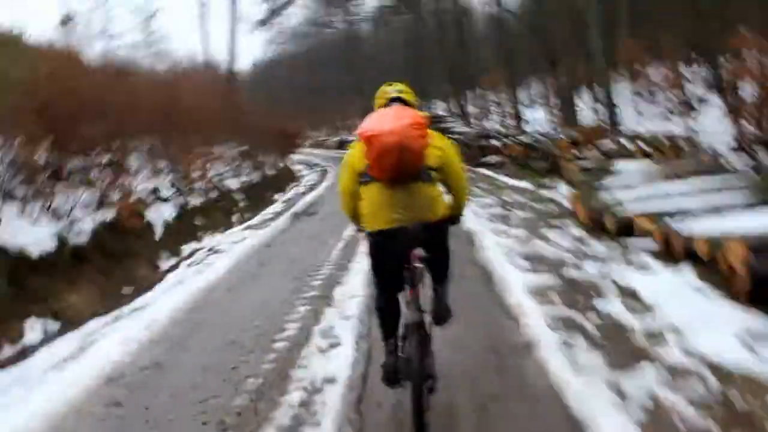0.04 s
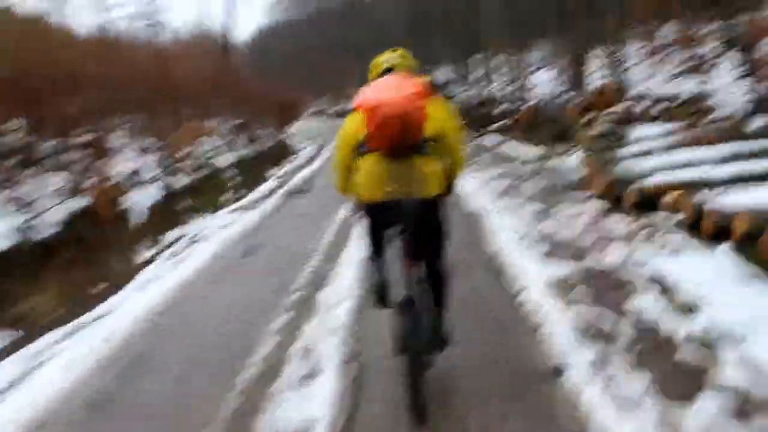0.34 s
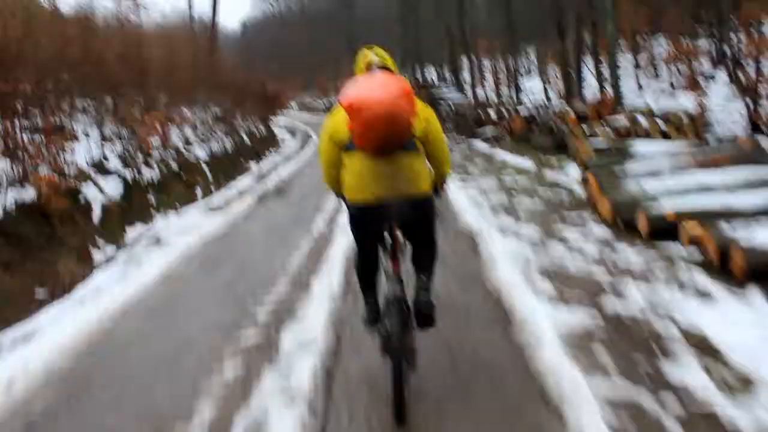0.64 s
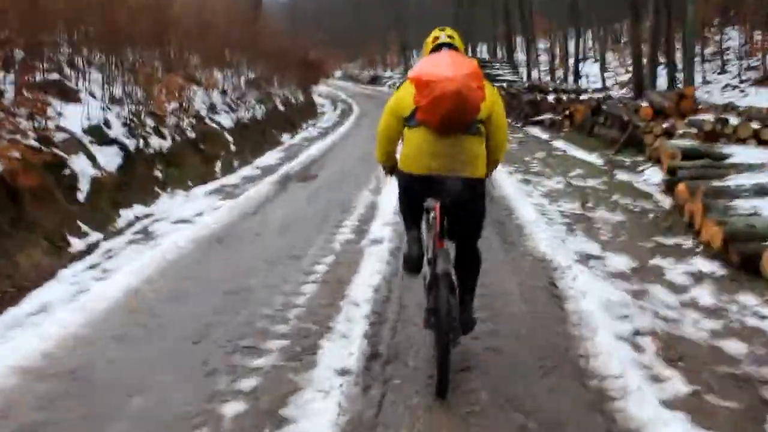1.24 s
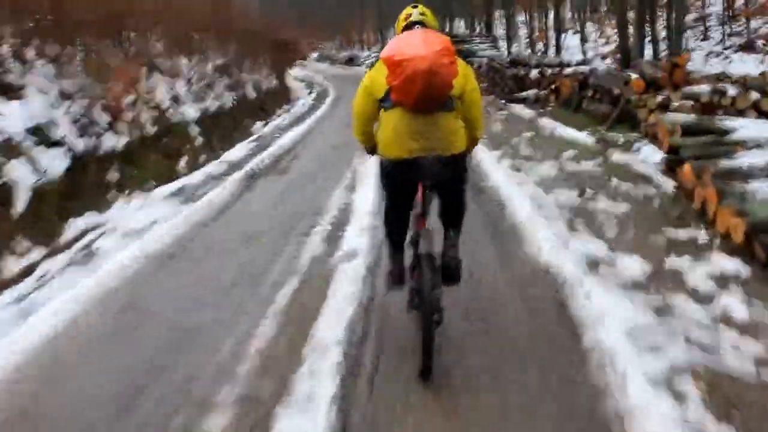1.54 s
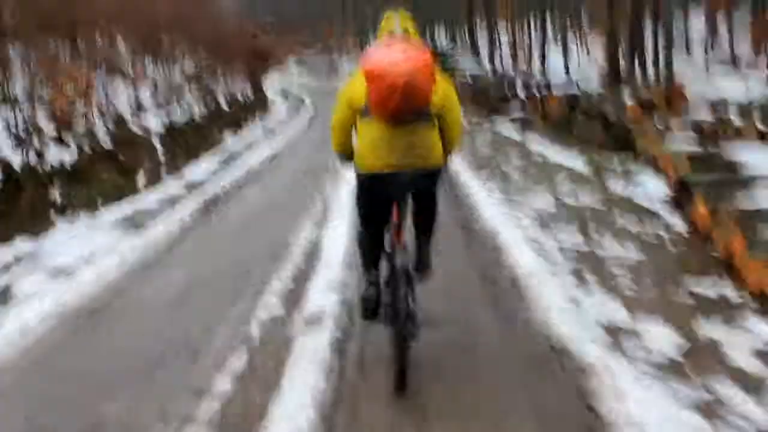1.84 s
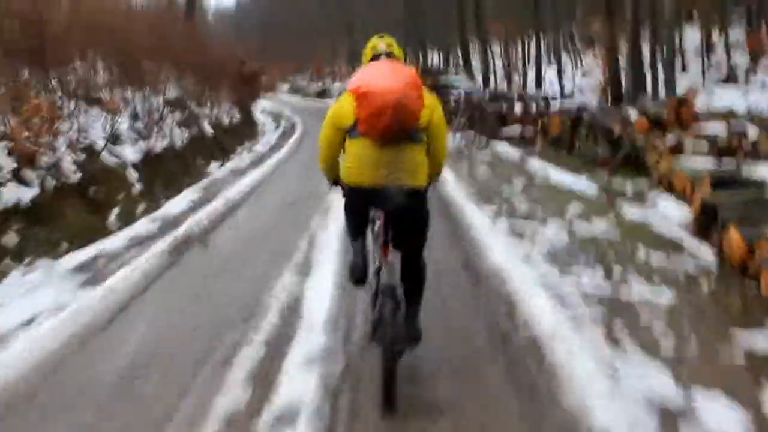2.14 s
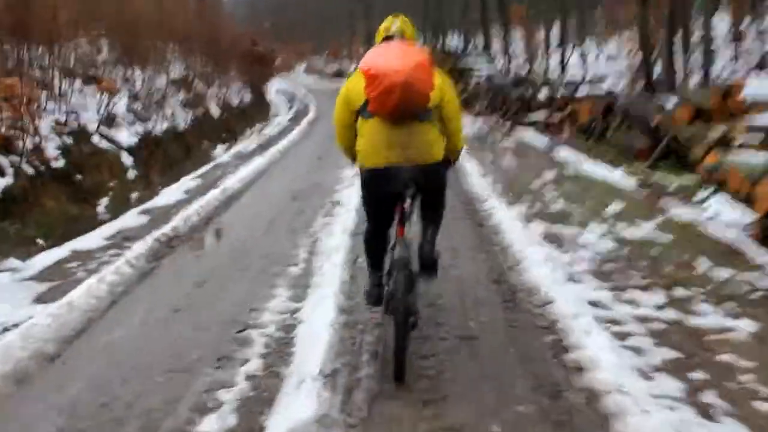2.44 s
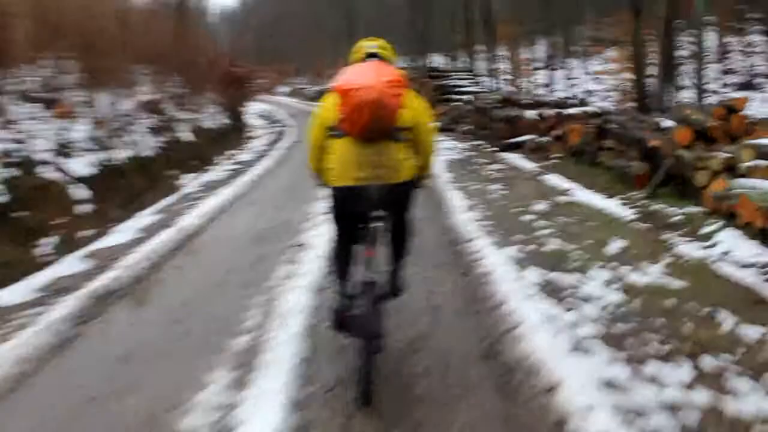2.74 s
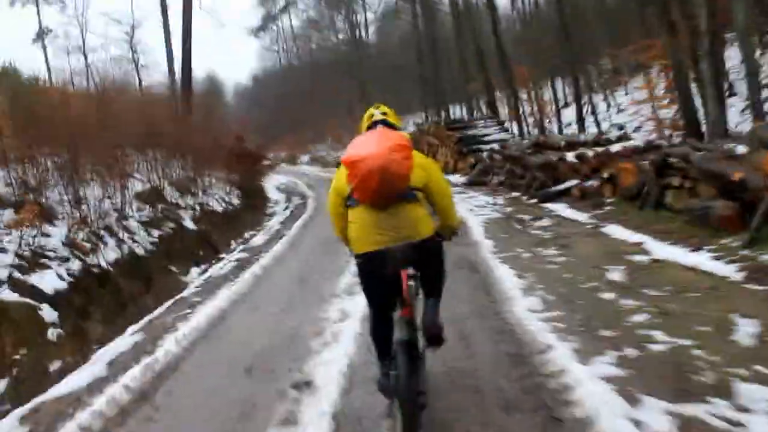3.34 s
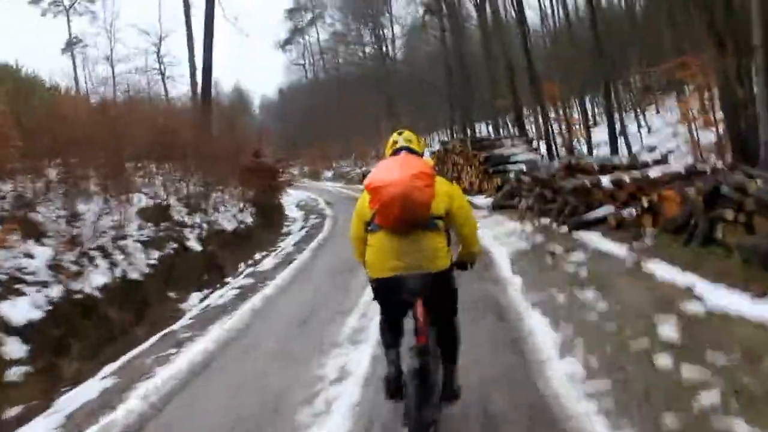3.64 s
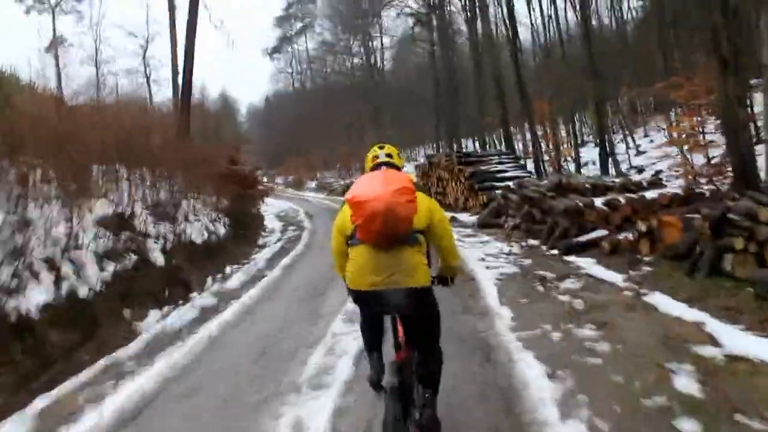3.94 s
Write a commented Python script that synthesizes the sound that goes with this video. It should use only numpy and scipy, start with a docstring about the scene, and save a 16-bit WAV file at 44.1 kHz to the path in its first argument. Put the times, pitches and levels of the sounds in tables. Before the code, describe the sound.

Bicycle tyres hiss and crackle over a wet, slushy forest track, with brief squelches and faint ticks of grit. Loud headwind rumbles on the moving microphone throughout, in uneven gusts with short thumps. The hardest blasts come around 0.3 to 0.5 seconds, with more near 0.8, 1.3, 2.8 and 3.2. From about 3.5 seconds the tyre spray grows quieter while the wind keeps buffeting.

```python
"""Mountain bike tyres on a wet, slushy forest track, heard from a bike riding behind.
The tread throws a spray of drops that hisses and crackles, flicks wet grit and now and then squelches
through slush. Headwind rumbles loudly on the moving microphone in gusts, with single eddies thumping
on the port; a limiter ducks everything after the hardest hits."""
import sys
import numpy as np
from scipy import signal
from scipy.fft import rfft, irfft
from scipy.io import wavfile
from scipy.ndimage import uniform_filter1d

SR = 44100
rng = np.random.default_rng(int(sys.argv[2]) if len(sys.argv) > 2 else 0)


def transcribe(signal):
    """Save signal, clipped to [-1, 1], as a 16-bit WAV file at the path in sys.argv[1]."""
    frames = np.atleast_2d(signal).T
    limited = np.clip(frames, -1, 1)
    pcm = np.round(limited * 32767).astype(np.int16)
    wavfile.write(sys.argv[1], SR, pcm)


N = 176400
TIME = np.arange(N) / SR


def from_db(db):
    """Decibels to gain."""
    return 10 ** (np.asarray(db) / 20)


def unit_power(x):
    """Normalise to an RMS of one."""
    return x / np.sqrt(np.mean(x ** 2) + 1e-20)


def automation(points):
    """A fader ride: straight lines between (seconds, value) points."""
    return np.interp(TIME, *np.transpose(points))


def coloured(x, curve):
    """EQ with a (Hz, dB) curve, falling 12 dB per octave past its ends; unit power."""
    hz, db = np.transpose(curve)
    log_hz = np.log(np.maximum(np.arange(N // 2 + 1) * SR / N, 1))
    beyond = np.maximum(np.log(hz[0]) - log_hz, 0) + np.maximum(log_hz - np.log(hz[-1]), 0)
    gain = from_db(np.interp(log_hz, np.log(hz), db)) * np.exp(-2 * beyond)
    return unit_power(irfft(rfft(x) * gain, N))


def band_around(x, hz, width):
    """Band-pass around a pitch, the width roughly a share of that pitch; unit power."""
    edges = np.clip(hz * np.exp(np.array([-.5, .5]) * width), 20, SR / 2 - 10)
    return unit_power(signal.sosfilt(signal.butter(2, edges, "band", fs=SR, output="sos"), x))


def drift(rate_hz):
    """Smooth random modulation with a spread of one."""
    hop, run_in = 40, 2000
    pole = np.exp(-2 * np.pi * rate_hz * hop / SR)
    noise = rng.standard_normal(N // hop + run_in + 2)
    slow = signal.lfilter([1], [1, -2 * pole, pole * pole], noise)[run_in:]
    return np.interp(np.arange(N) / hop, np.arange(len(slow)), unit_power(slow))


def grains(per_s, spread_db):
    """Random clicks, many small and a few large; unit power."""
    sizes = from_db(spread_db * np.minimum(rng.exponential(1, N), 4.5)) * rng.choice([-1, 1], N)
    return unit_power(sizes * (rng.random(N) < per_s / SR))


def swell(start, length, attack_s, release_s):
    """Envelope with a linear attack, a hold and an exponential release."""
    rise = np.clip((TIME - start) / attack_s + .5, 0, 1)
    fall = np.exp(-np.clip((TIME - start - length) / release_s, 0, 20))
    return rise * fall


def turbulence(source, colour, window_s=0.0167, evenness=0.75):
    """Lumpy air pressure, levelled to a fairly steady strength."""
    pressure = coloured(source, colour)
    power = uniform_filter1d(pressure ** 2, int(window_s * SR)) + 1e-4
    return unit_power(pressure / power ** (evenness / 2))


def headwind():
    """Air streaming over the moving microphone: a low rumble that comes in short puffs."""
    # Strength of the wind bed. Each row: time in seconds, level in dB before trim and puffs.
    strength = [(0, -20), (.22, -18), (.3, -25), (.5, -16.5), (.61, -28), (.71, -29.5), (.82, -21),
                (.9, -20), (1.12, -21), (1.25, -34.5), (1.3, -19), (1.7, -20), (1.8, -20.5), (1.94, -23),
                (1.99, -25.5), (2.1, -17), (2.5, -20), (2.66, -15), (2.71, -23), (2.95, -14), (3.03, -32.5),
                (3.11, -25), (3.2, -19), (3.68, -20.5), (3.76, -22), (3.81, -29.5), (3.88, -25), (4, -13)]
    # Tone of the rumble. Each row: frequency in Hz, relative level in dB.
    colour = [(25, -24), (50, -5), (100, 4.5), (200, 1), (300, -3), (450, -12.5), (700, -23), (1200, -38),
              (2500, -51)]
    trim_db = -3.5
    puffs_db = 5.5 * np.minimum(drift(rate_hz=25.5), 1)
    level = from_db(automation(strength) + trim_db + puffs_db)
    return level * turbulence(rng.standard_normal(N), colour)


def gusts():
    """Gusts buffet the microphone: low blasts with a ragged flutter on top."""
    # Each row: start in seconds, length in seconds, body and flutter levels in dB before their trims.
    blasts = [(.028, 0.033, -13.5, -31), (0.123, 0.037, -10.5, -28), (.166, .044, -16.5, -36),
              (0.316, 0.023, -4.5, -29), (0.342, 0.028, -2.5, -11.5), (0.377, 0.029, -9.5, -17),
              (0.418, 0.021, -5.5, -21), (0.451, 0.021, -4, -18.5), (0.644, 0.021, -14.5, -50),
              (.738, 0.022, -12, -29), (0.768, 0.01, -3.5, -12), (0.792, 0.005, -10, -30),
              (0.968, 0.013, -14.5, -35), (1.181, 0.024, -8, -20), (1.276, 0.012, -13.5, -42),
              (1.321, 0.052, -12, -28), (1.375, 0.025, -7.5, -19.5), (1.534, 0.017, -10, -30.5),
              (1.564, 0.014, -9.5, -21.5), (1.626, 0.02, -12, -29), (1.75, 0.014, -25, -26),
              (1.846, 0.015, -16.5, -48), (1.871, 0.014, -10, -21), (1.899, 0.023, -12, -28),
              (2.034, 0.013, -10, -31), (2.062, 0.034, -12, -24), (2.175, 0.014, -13.5, -28),
              (2.199, 0.027, -10.5, -27), (2.241, 0.04, -11.5, -30.5), (2.302, 0.013, -9.5, -31.5),
              (2.409, 0.0089, -13.5, -25.5), (2.445, 0.025, -17, -50), (2.51, 0.011, -14, -24.5),
              (2.558, 0.038, -18, -36), (2.611, 0.034, -16.5, -29), (2.737, .016, -9.5, -28),
              (2.755, 0.027, -4, -21), (2.796, 0.018, -14, -31), (2.816, .015, -10, -19),
              (2.852, 0.016, -14, -22), (2.879, 0.036, -15, -27), (2.922, 0.022, -10.5, -30),
              (2.947, 0.035, -15.5, -34), (3.148, 0.01, -3.5, -21), (3.165, 0.079, -14, -32),
              (3.257, 0.026, -18, -29), (3.304, 0.015, -11.5, -25), (3.37, 0.049, -11.5, -32),
              (3.4, 0.044, -14, -28.5), (3.446, 0.028, -11, -26), (3.481, 0.041, -7, -21),
              (3.538, .026, -10, -18.5), (3.57, 0.034, -16, -25), (3.61, 0.058, -9.5, -20.5),
              (3.673, 0.021, -20, -28), (3.899, 0.037, -10, -33), (3.949, 0.041, -9, -22.5)]
    # Tone of the body and of the flutter. Each row: frequency in Hz, relative level in dB.
    body_colour = [(25, -20), (50, -11.5), (90, -3), (180, 2), (280, -2.5), (420, -9.5), (650, -21.5),
                   (1000, -33), (1600, -81)]
    flutter_colour = [(200, -34), (400, 2.5), (650, 2), (1000, -4.5), (1500, -14), (2200, -27), (3500, -53)]
    body_trim_db, flutter_trim_db = -2, -1.5
    body_level, flutter_level = np.zeros(N), np.zeros(N)
    for start, length, body_db, flutter_db in blasts:
        shape = swell(start, length, attack_s=0.0027, release_s=0.0032)
        body_level = np.maximum(body_level, from_db(body_db + body_trim_db) * shape)
        flutter_level = np.maximum(flutter_level, from_db(flutter_db + flutter_trim_db) * shape)
    body = turbulence(rng.standard_normal(N), body_colour)
    flutter = turbulence(grains(per_s=900, spread_db=3.5), flutter_colour)
    return body_level * body + flutter_level * flutter


def eddies():
    """Each vortex thumps on the microphone port: a dip of pressure between two soft shoulders."""
    # Each row: time in seconds, peak in dB before the trim, half width in seconds.
    thumps = [(.323, 1, 0.0022), (0.34, 0.5, 0.00072), (0.365, 1.5, 0.00028), (0.429, -1, 0.00043),
              (0.75, -7.5, 0.0014), (0.77, -2.5, 0.00048), (1.188, -1.5, .0008), (1.324, -1, 0.0014),
              (1.346, 1, 0.0012), (1.383, -3, 0.00039), (1.395, -3, 0.00078), (1.631, -7, 0.00058),
              (1.876, -6.5, 0.0014), (2.037, -4, 0.00045), (2.075, -3.5, 0.00066), (2.256, -7, 0.00033),
              (2.408, -10.5, 0.0005), (2.759, 0, .001), (2.774, -4, 0.00019), (3.154, -2.5, 0.00082),
              (3.402, -10, .0007), (3.494, -2, 0.00062)]
    trim_db = -0.5
    pressure = np.zeros(N)
    for centre, db, half_width in thumps:
        offset_squared = np.minimum(((TIME - centre) / half_width) ** 2, 100)
        pressure -= from_db(db + trim_db) * (1 - offset_squared) * np.exp(-offset_squared / 2)
    return pressure


def grit():
    """Wet grit flicked by the tread: bright ticks that die within milliseconds."""
    # Each row: start in seconds, level in dB, centre frequency in Hz.
    flicks = [(.955, -30, 7900), (1.06, -26.5, 10000), (1.303, -25, 7500), (1.68, -25, 9200),
              (1.706, -27, 9000), (1.801, -28, 11000), (1.82, -25, 9500), (1.906, -29, 6940),
              (2.081, -29, 8900), (2.459, -28, 6060), (2.969, -27, 7300), (2.999, -28, 10000)]
    noise = rng.standard_normal(N)
    ticks = np.zeros(N)
    for start, db, hz in flicks:
        shape = swell(start, length=0.0011, attack_s=0.0006, release_s=0.0024)
        ticks += from_db(db) * band_around(noise, hz, width=0.58) * shape
    return ticks


def droplets(crackle_share=0.49):
    """Countless fine drops merge into hiss; the larger ones crackle."""
    crackle = grains(per_s=3500, spread_db=5.5)
    hiss = rng.standard_normal(N)
    return np.sqrt(crackle_share) * crackle + np.sqrt(1 - crackle_share) * hiss


def slush():
    """Slush squeezed from under a tyre: short wet spurts, each a burst of drops around its own pitch."""
    # Each row: start in seconds, length in seconds, level in dB, centre frequency in Hz.
    squelches = [(0.14, 0.014, -30, 2140), (0.18, 0.025, -28, 3600), (0.22, 0.0064, -25, 4340),
                 (0.254, 0.011, -28.5, 2860), (.505, 0.0088, -29.5, 3268), (.525, 0.0064, -31, 3400),
                 (0.954, 0.0067, -29.5, 3620), (1.667, 0.0063, -29, 4200), (1.773, 0.011, -29, 3800),
                 (1.901, 0.024, -29.5, 4140), (2.047, 0.01, -31, 2450), (2.53, 0.01, -27.5, 4060),
                 (2.587, 0.0062, -25, 4030), (2.599, .016, -25, 3860), (2.705, 0.029, -26.5, 3440),
                 (2.726, 0.047, -28, 4360), (2.993, 0.0074, -28, 2180), (3.482, 0.017, -28, 1670),
                 (3.806, 0.013, -31.5, 1900)]
    drops = droplets()
    spurts = np.zeros(N)
    for start, length, db, hz in squelches:
        shape = swell(start, length, attack_s=0.0017, release_s=0.0017)
        spurts += from_db(db) * band_around(drops, hz, width=0.45) * shape
    return spurts


def patchy_drops(flicker_db=1.5):
    """Drops of different sizes come in separate clumps, so each band flickers by itself."""
    clumps = np.zeros(N)
    edges_hz = np.geomspace(500, 19000, num=11)
    for band in zip(edges_hz, edges_hz[1:]):
        drops = signal.sosfilt(signal.butter(2, band, "band", fs=SR, output="sos"), droplets())
        clumps += from_db(flicker_db * drift(rate_hz=37)) * drops
    return clumps


def tyre_spray(spatters_per_s=33, spatter_decay_s=0.0032):
    """The tread throws water unevenly, with sudden spatters: coarse spray and a finer treble mist."""
    # Water thrown by the tyres. Each row: time in seconds, base level in dB.
    water = [(0, -31.5), (.1, -30), (.2, -27.5), (.25, -31.5), (.31, -29.5), (.35, -29), (.55, -31.5),
             (.7, -34), (.74, -28.5), (.8, -33), (.92, -34), (1.08, -31), (1.18, -29.5), (1.24, -32),
             (1.3, -27), (1.39, -36), (1.5, -27.5), (1.71, -31.5), (1.82, -26), (1.92, -30.5), (2.0, -33.5),
             (2.04, -30.5), (2.14, -33.5), (2.19, -29.5), (2.27, -35), (2.5, -32.5), (2.75, -29.5),
             (2.82, -30), (2.96, -31.5), (3.25, -32.5), (3.39, -32), (3.5, -39), (3.67, -44), (3.73, -38.5),
             (4, -37.5)]
    # Mist riding on that flow. Each row: time in seconds, offset in dB before the trim.
    mist_balance = [(0, -3.5), (.2, -2), (.5, -2), (.75, 0.5), (.9, -3), (1.07, 1), (1.2, -0.5),
                    (1.55, -0.5), (1.8, 0), (2.1, -1), (2.45, -0.5), (2.72, 0.5), (2.85, 0.5), (3.1, -1),
                    (3.4, -2), (3.6, 1.5), (3.85, 0), (4, 1)]
    # Tone of the spray and of the mist. Each row: frequency in Hz, relative level in dB.
    spray_colour = [(400, 2), (900, -5.5), (1500, -1), (2200, -1.5), (3200, 0.5), (4300, 1.5), (5300, 0),
                    (6500, -5.5), (9000, -22), (15000, -45)]
    mist_colour = [(3500, -26), (6000, -0.5), (8000, 1), (11000, -.5), (13500, -3.5), (16000, -8.5)]
    spray_trim_db, mist_trim_db = -0.5, -4.5
    throws = (rng.random(N) < spatters_per_s / SR) * rng.random(N)
    spatters_db = 6.5 * signal.lfilter([1], [1, -np.exp(-1 / (spatter_decay_s * SR))], throws)
    flicker_db = 1.48 * drift(rate_hz=82)
    flow = from_db(automation(water) + flicker_db + spatters_db)
    spray = from_db(spray_trim_db) * coloured(patchy_drops(), spray_colour)
    mist = from_db(automation(mist_balance) + mist_trim_db) * coloured(patchy_drops(), mist_colour)
    return flow * (spray + mist)


def scene():
    """Wind on the microphone over the tyres on the track, in mono."""
    wind = headwind() + gusts() + eddies()
    tyres = tyre_spray() + slush() + grit()
    return (wind + tyres)[None]


def record(dry):
    """Low cut, a limiter that ducks after peaks and recovers slowly, soft clipping and a steep high cut."""
    low_cut_hz, high_cut_hz = 32, 15700
    threshold_db, attack_s, recovery_db_per_s = -1, 0.0022, 27
    dry = signal.sosfilt(signal.butter(2, low_cut_hz, "high", fs=SR, output="sos"), dry)
    over_db = np.maximum(20 * np.log10(np.abs(dry[0]) + 1e-9) - threshold_db, 0)
    recovery_db = recovery_db_per_s * TIME
    held_db = np.maximum.accumulate(over_db + recovery_db) - recovery_db
    pole = np.exp(-1 / (attack_s * SR))
    duck_db = signal.lfilter([1 - pole], [1, -pole], held_db)
    limited = dry * from_db(-duck_db)
    rounded = limited / (1 + limited ** 8) ** (1 / 8)
    return signal.sosfilt(signal.ellip(12, .1, 90, high_cut_hz, fs=SR, output="sos"), rounded)


dry = scene()
out = record(dry)
transcribe(out)
```